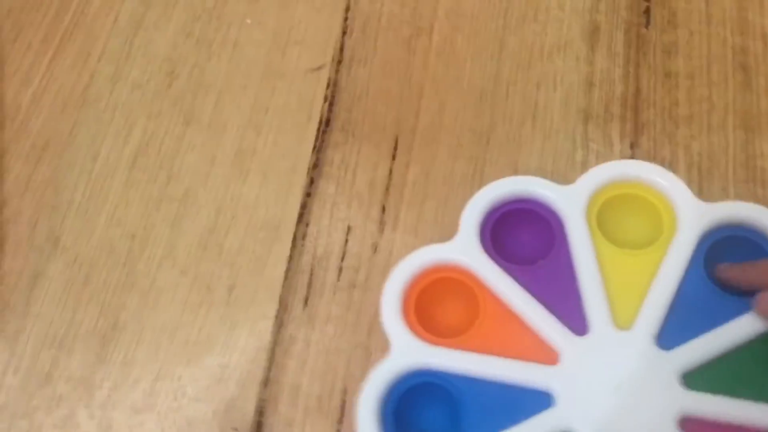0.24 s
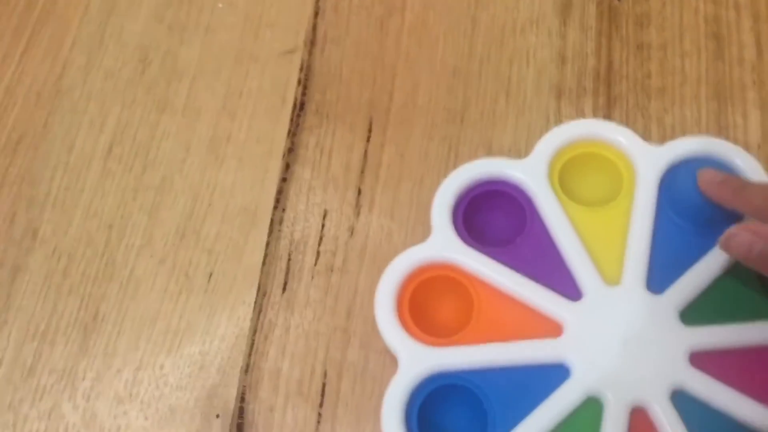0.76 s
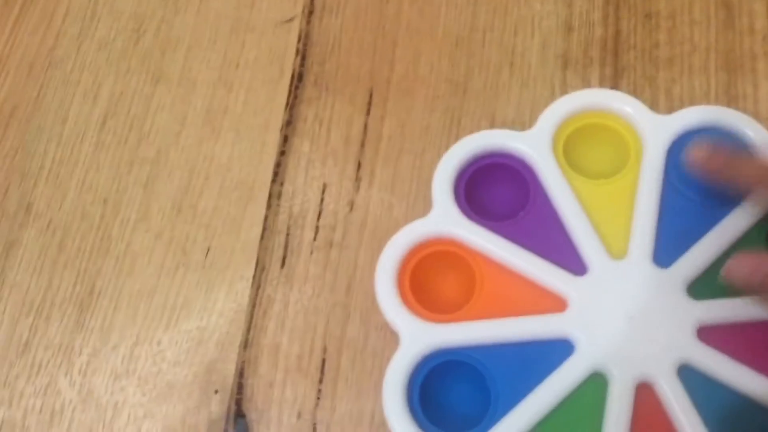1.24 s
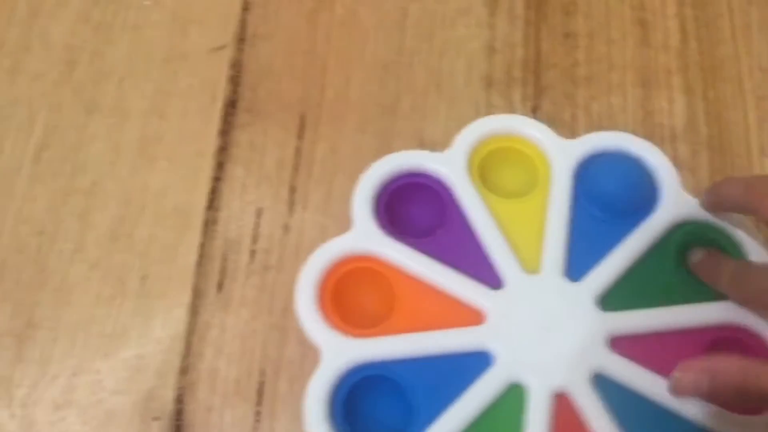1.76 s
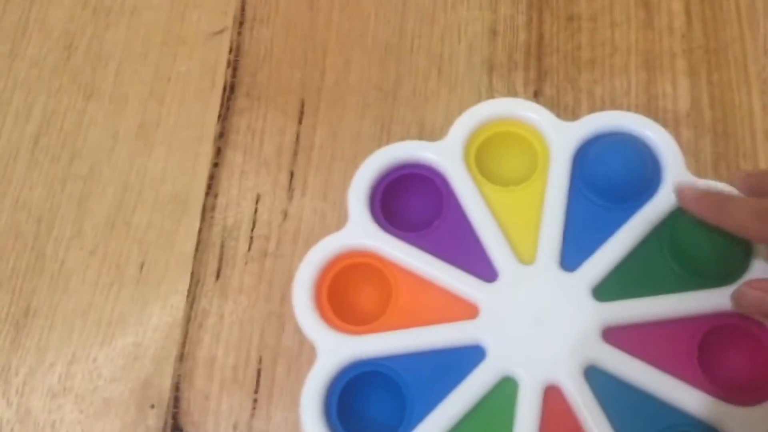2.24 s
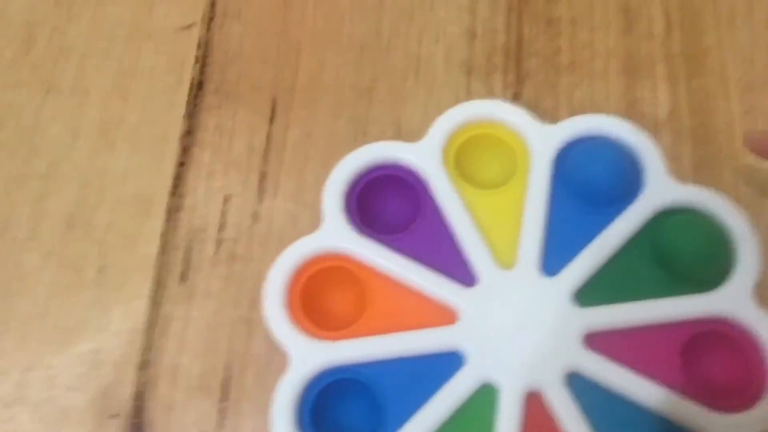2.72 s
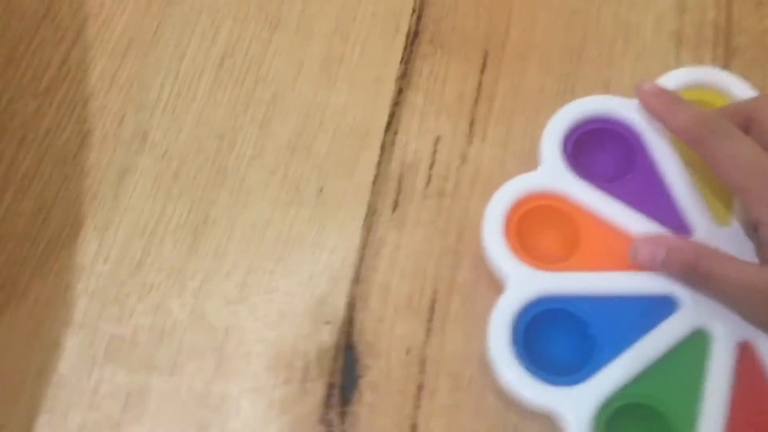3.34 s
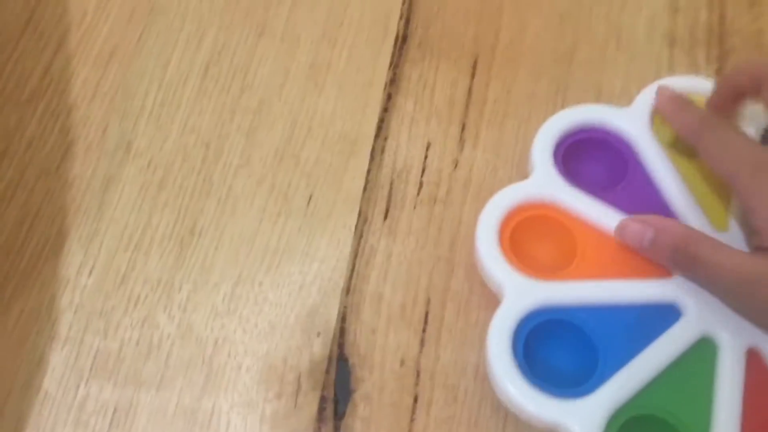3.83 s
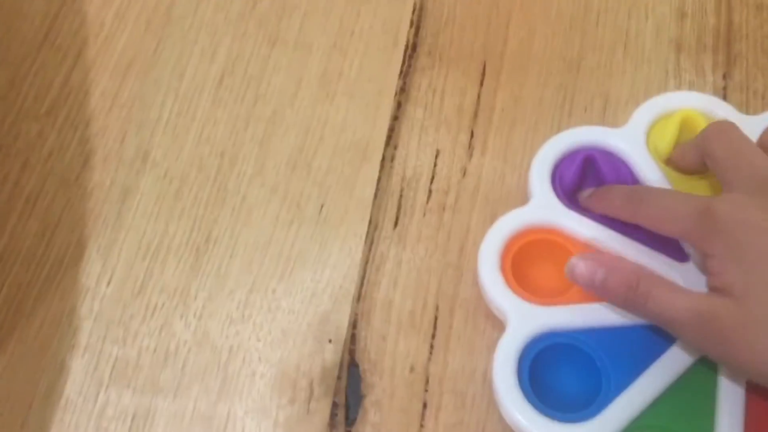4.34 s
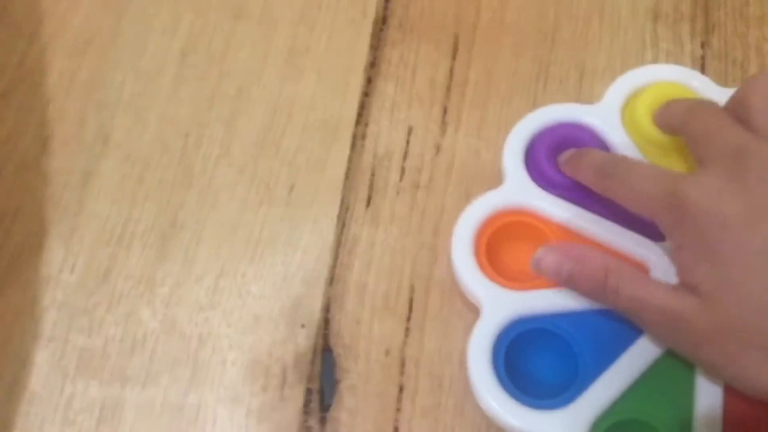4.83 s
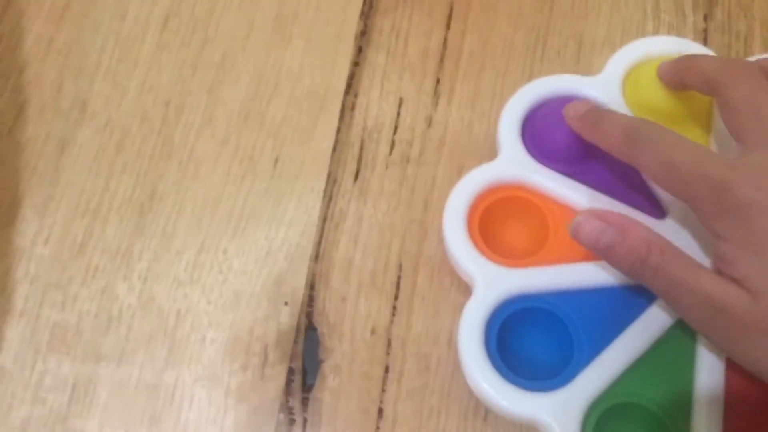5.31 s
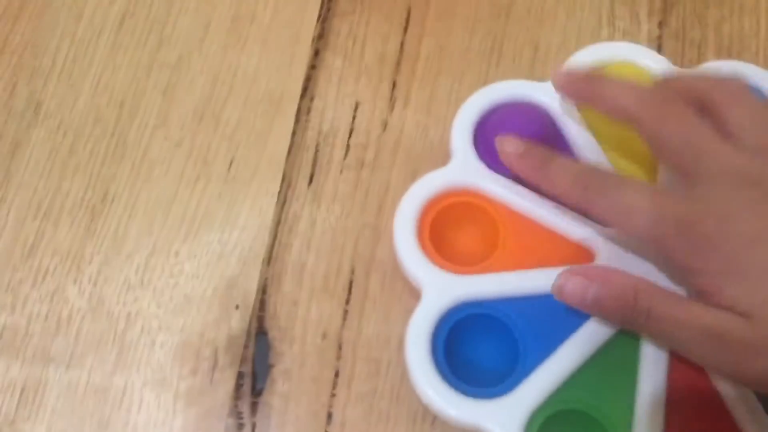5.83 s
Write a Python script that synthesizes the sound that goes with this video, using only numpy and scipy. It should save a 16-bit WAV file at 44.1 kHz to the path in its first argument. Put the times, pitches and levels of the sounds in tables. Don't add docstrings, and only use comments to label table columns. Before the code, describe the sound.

Close phone pickup in a small, quiet room, all contacts sounding reversed: reverberation swells up, then the dry snap ends abruptly. Faint taps and hand rubbing open over soft hiss. At 0.4 s a quick rub leads to the loudest event, a bright hollow dome pop at 0.55 s with a low table thump. Light ticks and a swelling skin rub follow to 1 s, with a small pop at 1.4. From 1.7 to 1.95 s, clacks, rim scrapes, a brief squeak and a strong abrupt slide cluster together; a boomy pop lands at 2.12. Faint scrapes and taps fill the calm until a rub at 3.4, then a duller double pop with a deep thump at 3.67 and a sharp clack at 3.82. Clacks gather around 4.2 and 4.83. After a pause, dull fingertip knocks run from 5.6 to 6.06 s, strongest at 5.88.

```python
import sys
import numpy as np
from scipy import signal
from scipy.fft import rfft, irfft
from scipy.io import wavfile
from scipy.ndimage import uniform_filter1d

SR = 44100
rng = np.random.default_rng(int(sys.argv[2]) if len(sys.argv) > 2 else 0)


def elevation(decibels):
    levels = np.asarray(decibels, float)
    return 10 ** (levels / 20)


def to_wav(sig):
    pcm = np.clip(np.atleast_2d(sig), -1, 1) * 32767
    pcm = np.round(pcm).astype(np.int16)
    wavfile.write(sys.argv[1], SR, pcm.T)


N = 267863


def band(x, lo_hz, hi_hz):
    return signal.sosfilt(signal.butter(3, [lo_hz, min(hi_hz, .45 * SR)], "band", fs=SR, output="sos"), x)


def unit(x):
    return x / np.sqrt(np.mean(x ** 2))


def loudest(x):
    return x / np.sqrt(uniform_filter1d(x ** 2, size=130).max())


def noise(lo_hz, hi_hz):
    return unit(band(rng.standard_normal(N), lo_hz, hi_hz))


def hiss():
    # frequency in Hz, spectral density in dB per Hz.
    density = [(15, -42), (25, -6.5), (80, -4.5), (120, -19.5), (153, -12), (396, -15.5), (441, -17.5),
               (533, -14), (594, -17), (758, -19), (16200, -26.5)]
    hz, db = np.transpose(density)
    bins = np.arange(1, N // 2 + 2) * SR / N
    gain = elevation(np.interp(np.log(bins), np.log(hz), db))
    return elevation(-68.5) * unit(irfft(rfft(rng.standard_normal(N)) * gain, N))


def chirps():
    # length in s, centre in Hz, bandwidth in Hz, level in dB.
    squeaks = [(0.064, 3660, 350, -67.5), (0.056, 2920, 180, -71.5), (.05, 2560, 600, -74),
               (0.016, 7400, 1100, -62), (0.017, 15000, 3100, -63), (0.022, 3200, 260, -77),
               (0.025, 3500, 750, -73), (0.022, 1340, 320, -64.5), (0.0087, 1300, 350, -55.5),
               (0.0078, 1410, 220, -42), (0.015, 1110, 260, -74)]
    centres_s = [1.05, 1.04, 1.18, .40, .03, 4.02, 4.265, 1.72, 1.782, 1.838, 1.81]
    t, out = np.arange(N) / SR, 0
    for s, (length, hz, width, db) in zip(centres_s, squeaks):
        swell = np.exp(-((t - s) / length) ** 2)
        out = out + elevation(db) * swell * noise(hz - width / 2, hz + width / 2)
    return out


def rubbing():
    # loudest moment in s, swell in s, fade in s, dull scrape in dB, bright hiss in dB.
    slides = [
        (0.022, 0.08, 0.27, -71, -69.5),
        (.418, 0.13, .05, -63.5, -63),
        (0.948, 0.3, 0.053, -65, -66),
        (1.65, 0.08, 0.074, -66, -66),
        (1.901, 0.045, 0.0069, -44.5, -52),
        (2.58, 0.21, 0.16, -76, -77),
        (3.4, 0.17, 0.052, -62.5, -61),
        (4.22, .02, 0.14, -75, -69),
        (4.57, 0.036, .04, -73, -88),
    ]
    grain_size = elevation(0.85 * np.repeat(rng.exponential(size=N // 40 + 1), 40)[:N])
    grains = rng.standard_normal(N) * grain_size
    dull, bright = unit(band(grains, 460, 3500)), unit(band(grains, 3000, 17000))
    t, out = np.arange(N) / SR, 0
    for s, swell, fade, dull_db, bright_db in slides:
        rise = np.exp(np.minimum(t - s, 0) / swell)
        fall = np.exp(-((t - s) / fade) ** 2)
        stroke = np.where(t < s, rise, fall)
        out = out + stroke * (elevation(dull_db - 5) * dull + elevation(bright_db - 5) * bright)
    return out


def thuds(column, t60, build_s, floor_db):
    # time in s, rumble in dB, boom in dB.
    landings = [(.02, -65, -60), (.13, -65, -69), (.28, -64, -76), (.555, -42.5, -62), (.66, -84.5, -63.5),
                (.85, -82, -63.5), (1.24, -77, -66), (1.42, -61, -71), (1.66, -62.5, -83.5),
                (1.78, -54.5, -85), (1.851, -47.5, -82), (1.912, -48.5, -80), (2.12, -52.5, -47),
                (2.28, -76, -74), (2.7, -68, -88.5), (3.677, -40.5, -53.5), (3.82, -56.5, -62),
                (3.97, -70, -66.5), (4.17, -65, -57), (4.21, -52.5, -78.5), (4.62, -70, -83),
                (4.83, -53.5, -59.5), (4.87, -51, -55.5), (5.47, -73, -70), (5.6, -62.5, -57.5),
                (5.79, -55.5, -58), (5.88, -53, -55.5), (6.07, -62.5, -64)]
    t = np.arange(SR // 2) / SR
    shape = (1000. ** (-t / t60) * (1 - np.exp(-(t / build_s) ** 2))) ** 2
    power = np.full(N + 2 * len(t), elevation(2 * floor_db))
    for row in landings:
        end = int(row[0] * SR) + len(t)
        power[end - len(t):end] += elevation(2 * row[column]) * shape[::-1] / shape.max()
    return np.sqrt(power[len(t):len(t) + N])


def lows():
    boom_hz = 153.3
    wander = np.cumsum(uniform_filter1d(rng.standard_normal(N), size=4000)) * 0.0051
    boom = np.sqrt(2) * np.sin(2 * np.pi * boom_hz * np.arange(N) / SR + wander)
    table_gain = thuds(column=1, t60=.25, build_s=.016, floor_db=-76.5)
    air_gain = thuds(column=2, t60=.23, build_s=.04, floor_db=-86)
    return elevation(-2.5) * table_gain * noise(50, 120) + elevation(-3.5) * air_gain * boom


def hollow():
    # frequency in Hz, bandwidth in Hz, level in dB, t60 in s.
    cavity = [(1187, 140, -50.5, 0.25), (1940, 180, -54, .3), (2740, 160, -54, .25)]
    t, response = np.arange(SR // 2) / SR, 0
    for hz, width, db, t60 in cavity:
        wave = unit(band(rng.standard_normal(len(t)), hz - width / 2, hz + width / 2))
        response = response + elevation(db) * wave * 1000. ** (-t / t60) * (1 - np.exp(-t / .008))
    return response


def room():
    # delay in s, level in dB.
    echoes = [(.0142, -19), (.029, -27)]
    # low edge of the band in Hz, level in dB, t60 in s.
    tail = [(150, -6, 0.22), (700, -9.5, .3), (1480, -9, .3), (2640, -6.5, 0.36), (4500, -10, 0.26),
            (7976, -11, 0.29), (11900, -4.5, .22)]
    t = np.arange(SR // 2) / SR
    early = sum(elevation(db) * (t >= s) * np.exp(-np.abs(t - s) / 0.0015) for s, db in echoes)
    flat = early * rng.standard_normal(len(t)) / np.sqrt(0.00064 * SR)
    response = band(flat, 3500, 18000) + .55 * band(flat, 200, 3500)
    edges = [row[0] for row in tail] + [18000]
    for (lo, db, t60), hi in zip(tail, edges[1:]):
        share = np.sqrt((hi - lo) / (SR / 2))
        wash = unit(band(rng.standard_normal(len(t)), lo, hi)) * share
        response += elevation(db - 33) * wash * 1000. ** (-t / t60) * (1 - np.exp(-(t / 0.01) ** 2))
    return response


def ring(modes, rise_s, t, grit, chance):
    contact_s, rattle_level = 0.0042, .6
    hz, db, t60 = np.transpose(modes)[:, :, None]
    detune, weight = chance[:len(modes), None], chance[6:6 + len(modes), None]
    tones = np.sin(2 * np.pi * hz * (1 + .015 * detune) * t)
    waves = elevation(db + 1.2 * weight) * tones * 1000. ** (-t / t60)
    ringing = loudest(waves.sum(axis=0) * (1 - np.exp(-t / rise_s)))
    rattle = loudest(band(grit * np.exp(-t / contact_s), hz.min(), hz.max()))
    return loudest(ringing + rattle_level * rattle)


def blows():
    # time in s, level in dB,
    # brightness in dB per part, crack in dB, dome pitch in Hz.
    pops = [(.3974, -70, 9, -55, 2020), (.5478, -36.5, -3, -25, 1880), (.5501, -19, 0.5, -24.5, 2020),
            (.5626, -49, 2, -34, 2690), (1.4155, -51, -1, -55, 753), (1.8925, -53, -3.5, -33, 2000),
            (1.907, -61, 9.5, -49, 2000), (1.9106, -43.5, -1, -41, 1900), (2.1204, -37, 3, -44, 1927),
            (3.4147, -62, 6, -51.5, 2000), (3.665, -35, -5, -39, 1450), (3.6682, -37.5, 2.5, -38.5, 2716),
            (3.6736, -52.5, 1.5, -61.5, 2540), (4.1944, -67, 0, -51, 1970),
            (4.1999, -53.5, -7.5, -52, 2050), (4.865, -53.5, -4.5, -50.5, 2060)]
    # time in s, level in dB, brightness in dB per part, crack in dB.
    clacks = [(1.7265, -63, 1.5, -72), (1.7912, -56, 2, -72), (2.5232, -64, 0, -77),
              (3.3748, -54, 1.5, -56), (3.8091, -48, -1, -65), (3.8213, -39, -1, -29),
              (3.9405, -66.5, 0, -78), (4.1635, -45.5, 1, -67), (4.1687, -47, -1.5, -71),
              (4.19, -54.5, 2.5, -55), (4.2029, -52, 1.5, -59), (4.8211, -49, 0.5, -46),
              (4.83, -49.5, -7, -58), (4.8358, -39, -0.5, -42)]
    knocks = [(.1225, -49.5, 5, -80), (.562, -48.5, -4.5, -80.5), (1.4125, -60, -12, -75),
              (5.767, -55, 0.5, -81.5), (2.0963, -54, -3, -77), (2.1045, -53, -4, -74),
              (3.9758, -55.5, 2, -73), (5.586, -53.5, -0.5, -78.5), (5.5934, -53, -2.5, -81),
              (5.6012, -60, 4.5, -69), (5.783, -52.5, -2, -70.5), (5.8522, -49.5, -5, -70.5),
              (5.866, -55, -5, -73), (5.8812, -41, 0, -64), (6.058, -48.5, -2, -70)]
    scrapes = [(.2878, -68, 4, -62), (.99, -65, -1, -61), (1.662, -63, 4, -55.5), (1.7125, -58, -1, -66),
               (1.7874, -49.5, -1, -71), (1.8405, -54, 1, -71), (1.8493, -43.5, 1, -71),
               (1.8769, -60, 5, -70), (1.8813, -47.5, 2.5, -45), (2.1673, -69.5, 0, -75),
               (2.2371, -60.5, 1.5, -79), (2.25, -62, -1.5, -71), (2.2622, -69.5, 3.5, -68.5),
               (4.2794, -66.5, 2, -64), (4.3143, -72, 5, -75), (5.9215, -62, -1, -67)]
    taps = [(.03, -67.5, 1.5, -59), (.076, -70, -8, -66), (.113, -76, -2, -59), (.1457, -81.5, 2, -55.5),
            (.2147, -68, -2, -66), (.2834, -63.5, -1.5, -56.5), (.3303, -70, 1, -63),
            (.7976, -65, -0.5, -62.5), (.8658, -61.5, -1.5, -62.5), (.9095, -68, 3, -60),
            (.926, -79.5, 9.5, -56.5), (.9987, -63.5, 0, -78), (1.627, -64.5, 2.5, -56.5),
            (1.7608, -63, -1, -66), (1.8621, -61.5, -13, -66), (2.5532, -63, 1.5, -60),
            (2.5988, -65, 0, -60), (2.7098, -68, 1, -64.5), (2.906, -66, -2, -77.5), (3.222, -70, -4, -66),
            (3.341, -68, 0, -70), (4.308, -68.5, -1, -72)]
    dome_hz = 1981
    # blows, balance over table, frame, dome and rim in dB, frame pitch ratio.
    kinds = ((pops, (-7, -1, 0, -4.5), 1),
             (clacks, (-5.5, 0.5, -7.5, -7), 1),
             (knocks, (-2.5, 0, -15, -24.5), .94),
             (scrapes, (-12.5, 1.5, -9.5, -1), 1),
             (taps, (-3, -1, -5.5, -4), 1))
    out = []
    for rows, balance, held in kinds:
        for s, db, tip, crack, *hz in rows:
            levels = db + np.array(balance) + tip * (np.arange(4) - 1)
            pitch = (*hz, dome_hz)[0] / dome_hz
            out.append((s, held, pitch, *levels, crack))
    return out


def hits():
    # frequency in Hz, level in dB, t60 in s.
    table_top = [(219.2, -1, 0.031), (317.8, -1.5, 0.015), (410, 0, 0.021), (473, -6, .025)]
    frame = [(778, -5.5, 0.024), (1001.6, 6, 0.014), (1130, 0.5, 0.013), (1312, -10, 0.02)]
    dome = [(1657, -5, .014), (1969, -2, 0.014), (2440, -9, 0.015)]
    rim = [(2966, -2, 0.016), (3250, 0, 0.0092), (3750, -4.5, 0.014), (4410, -11.5, 0.014),
           (5250, -4, 0.0067)]
    # rise time of table, frame, dome and rim in s; the rim takes up the push fastest.
    rises_s = [0.0013, 0.001725, .0012, 0.00055]
    crack_s, tick = 0.0024, 5
    t = np.arange(2600) / SR
    rows = blows()
    near, spread = np.zeros((2, N + len(t)))
    grit = rng.standard_normal((len(rows), len(t)))
    chance = rng.standard_normal((len(rows), 48))
    grit[:, 0] += tick
    edges = [(0.8 * m[0][0], 0.96 * m[-1][0]) for m in (table_top, frame, dome, rim)]
    edges.append((5800, 16200))
    clicks = np.array([loudest(band(1. * (t == 0), *e)) for e in edges])
    for (s, held, pitch, *db), g, c in zip(rows, grit, chance):
        struck = (table_top, np.array(frame) * (held, 1, 1), np.array(dome) * (pitch, 1, 1), rim)
        parts = [ring(m, rise, t, g, c[12 * k:]) for k, (m, rise) in enumerate(zip(struck, rises_s))]
        crack = np.diff(g, prepend=0) * np.exp(-t / crack_s)
        parts.append(loudest(band(crack, *edges[-1])))
        at = int(np.clip(N - s * SR, 0, N))
        near[at:at + len(t)] += elevation(np.array(db)) @ np.array(parts)
        spread[at:at + len(t)] += elevation(np.array(db)) @ clicks
    return near[:N], spread[:N]


def scene():
    near, spread = hits()
    reverberant = signal.fftconvolve(0.12 * near + spread, room() + hollow())[:N]
    backwards = (near + reverberant)[::-1]
    return (backwards + lows() + rubbing() + chirps() + hiss())[None]


def roll_off(x):
    return signal.sosfilt(signal.butter(12, 16330, fs=SR, output="sos"), x)


def record(dry):
    low_pass = signal.ellip(10, .1, 55, 15880, fs=SR, output="sos")
    top = signal.sosfiltfilt(low_pass, dry)
    return roll_off(top)


dry = scene()
out = record(dry)
to_wav(out)
```